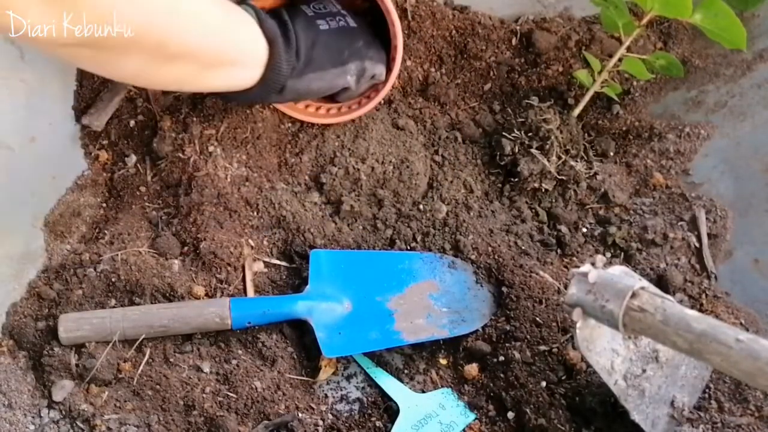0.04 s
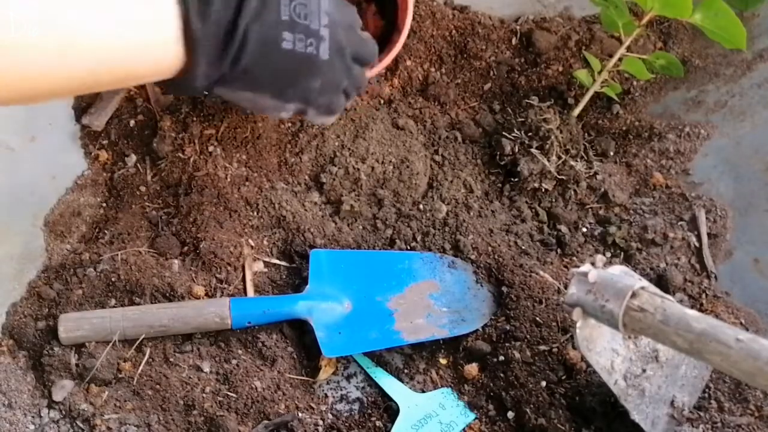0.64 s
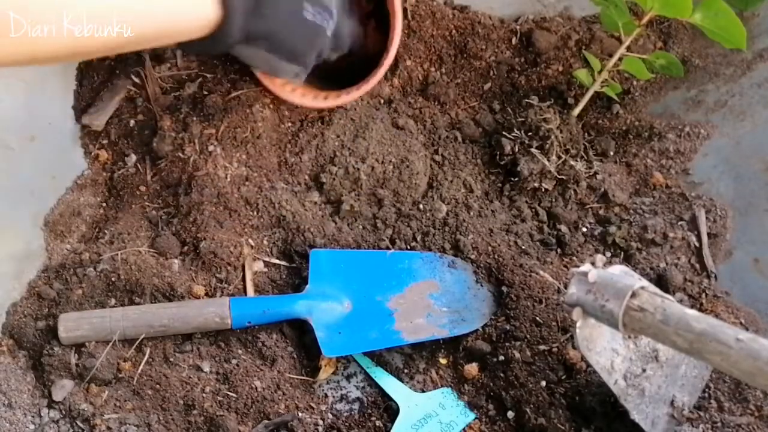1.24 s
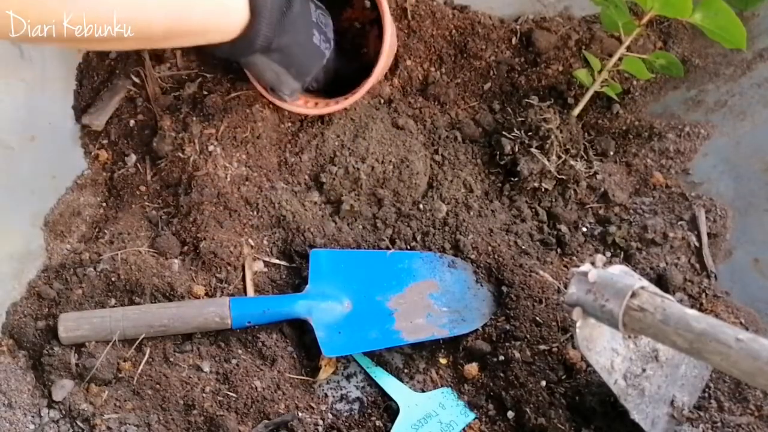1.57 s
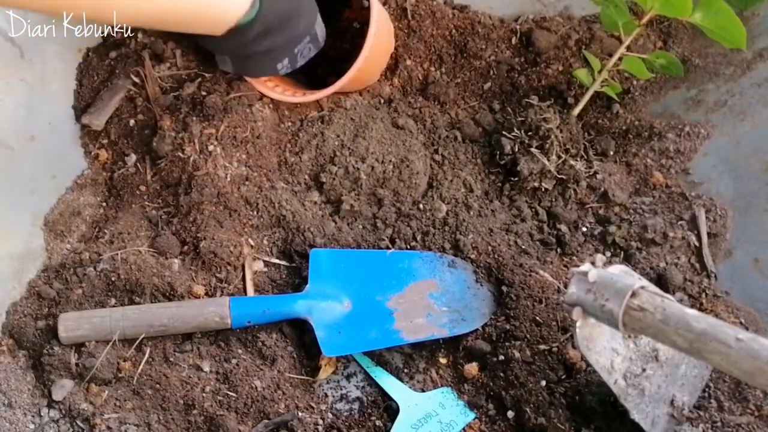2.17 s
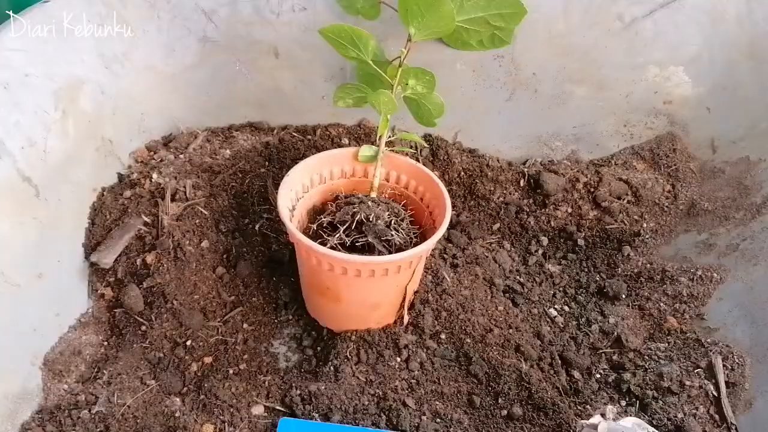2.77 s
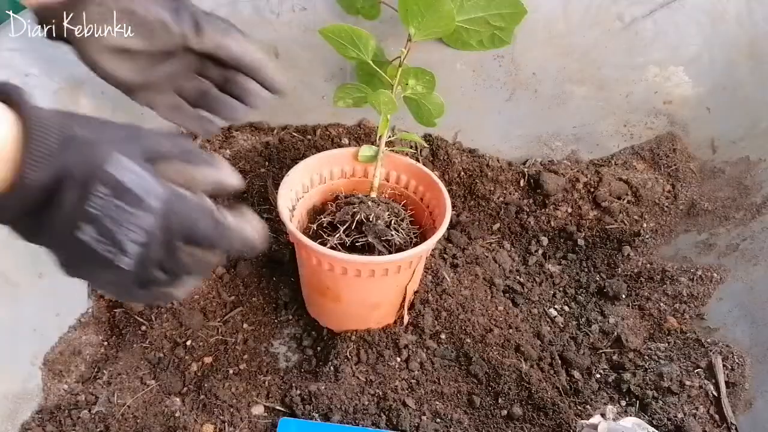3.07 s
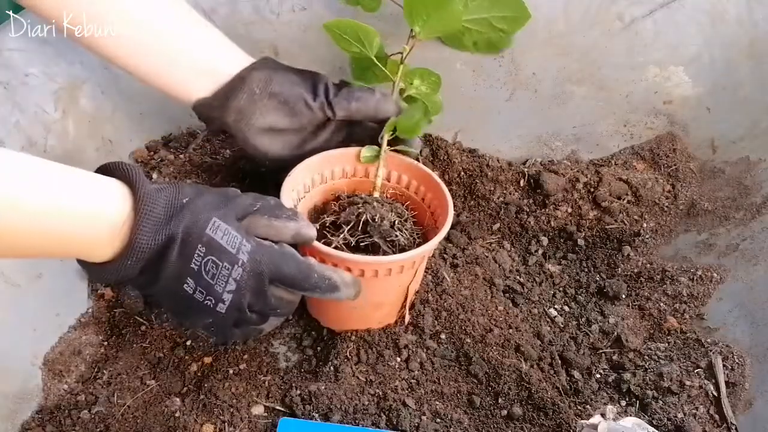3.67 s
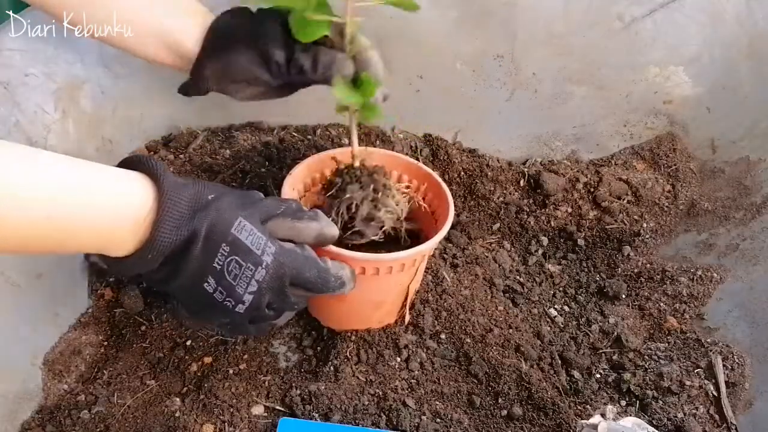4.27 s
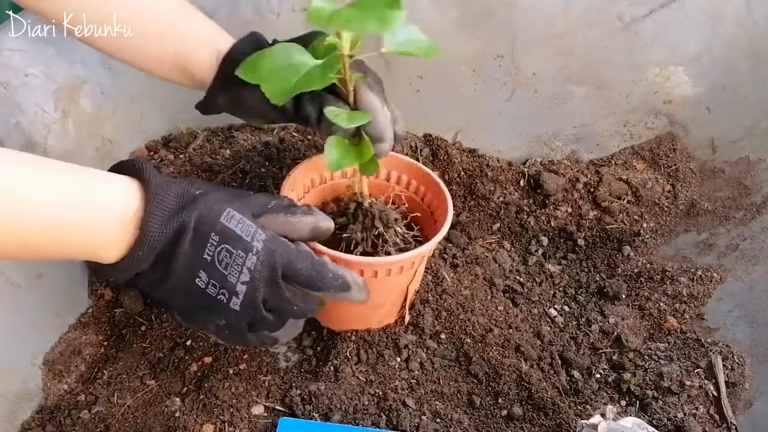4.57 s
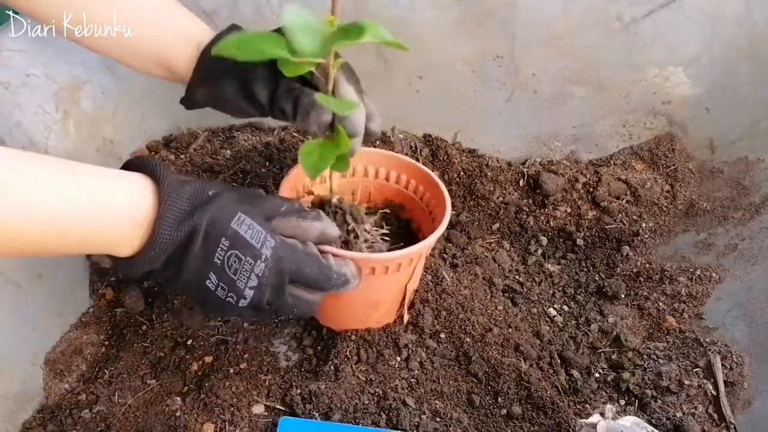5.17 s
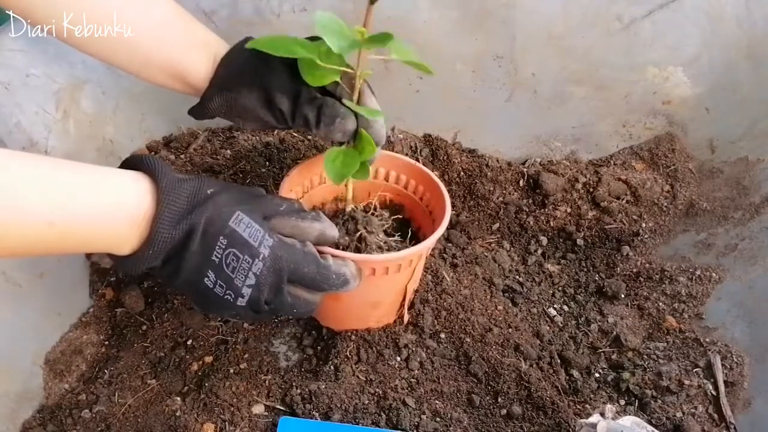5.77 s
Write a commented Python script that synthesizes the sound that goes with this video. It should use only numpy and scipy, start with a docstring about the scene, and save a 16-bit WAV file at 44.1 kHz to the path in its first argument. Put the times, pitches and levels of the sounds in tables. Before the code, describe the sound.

Soil crunches and ticks against a plastic plant pot as rubber gloves rub it, with a faint engine rumbling far off.

```python
"""Potting a seedling.

Gloved hands work crumbly soil in a plastic pot beside a concrete wall, then set a seedling into it.
Slipping crumbs and breaking clods excite the pot's resonances; the rubber gloves squeak by stick-slip.
Behind them a distant engine rumbles, machinery hums, the air hisses, and two insects and a thin whistle
sound faintly. At one instant the background jumps, with a click, to a fuller rumble."""
import sys
import numpy as np
from scipy import signal
from scipy.fft import rfft, irfft
from scipy.io import wavfile

SR = 44100
rng = np.random.default_rng(int(sys.argv[2]) if len(sys.argv) > 2 else 0)


def int16_out(signal):
    """Quantize to a 16-bit WAV file."""
    q = np.round(np.clip(np.atleast_2d(signal).T, -1, 1) * 32767)
    wavfile.write(sys.argv[1], SR, q.astype(np.int16))


N = 256662
TIME = np.arange(N) / SR
FREQS = np.maximum(np.fft.rfftfreq(N, 1 / SR), 1)
JUMP_S = 2.703   # the background passes from its first state to its second
RESTING_DB = -78.5   # grinding between strokes: the hands never lie quite still

# Spectrum of coarse crumbs crunching: f/Hz, relative spectral level/dB
CRUNCH_SPECTRUM = [(300, -11.5), (510, -2), (620, -15.5), (760, -3.5), (930, -2), (1100, 0.5), (1330, -3.5),
                   (1800, -4.5), (2600, -36.5)]
# Spectrum of the hiss of sliding glove and crumbs: f/Hz, relative spectral level/dB
HISS_SPECTRUM = [(2400, -7.5), (3800, -0.5), (5500, 2), (7000, 0), (8400, -3.5), (9700, -0.5), (11500, -6),
                 (13000, -13), (15000, -26)]


def from_db(db):
    """Amplitude ratio of a level: a factor of ten per 20 dB."""
    return 10 ** (np.asarray(db) / 20)


def unit_rms(x):
    """Normalisation to unit mean power."""
    return x / np.sqrt(np.mean(x ** 2) + 1e-20)


def balance(left_db):
    """Interaural level difference: the left gains the level that the right loses."""
    return from_db([[left_db], [-left_db]])


def at_freqs(points):
    """Interpolation of a curve on a logarithmic frequency axis."""
    hz, value = np.transpose(points)
    return np.interp(np.log(FREQS), np.log(hz), value)


def drift(knots_per_s):
    """Random modulation of unit rms: Gaussian values joined by straight lines."""
    knots = rng.standard_normal(1400)
    return unit_rms(np.interp(TIME * knots_per_s, np.arange(len(knots)), knots))


def colour(x, spectrum):
    """Minimum-phase filtering by the folded cepstrum; white noise keeps its power."""
    cepstrum = irfft(np.log(unit_rms(from_db(at_freqs(spectrum)))), N)
    cepstrum[1:N // 2] *= 2
    cepstrum[N // 2 + 1:] = 0
    return irfft(rfft(x) * np.exp(rfft(cepstrum)), N)


def resonate(x, hz, width_hz, block=256):
    """Two-pole resonance whose centre follows a curve; white noise keeps its power."""
    radius = np.exp(-np.pi * width_hz / SR)
    b = np.sqrt((1 - radius ** 2) / 2) * np.array([1, 0, -1])
    out, state = np.zeros_like(x), np.zeros((2, 2))
    for i in range(0, x.shape[1], block):
        a = [1, -2 * radius * np.cos(2 * np.pi * hz[i] / SR), radius ** 2]
        out[:, i:i + block], state = signal.lfilter(b, a, x[:, i:i + block], zi=state)
    return out


def diffuse_noise(gain):
    """A diffuse field of unit rms: the two sides are coherent only at long wavelengths."""
    # Likeness of left and right: f/Hz, correlation coefficient
    correlation = [(30, .9993), (70, .996), (150, .975), (250, .78), (350, .48), (480, -.35), (700, -.45),
                   (1000, -.2), (1500, .08), (12000, 0)]
    # Lean of the field: f/Hz, level/dB added on the left and taken from the right
    left_bias = [(200, 0), (450, 1), (1000, 1), (2500, 0), (6000, -1)]
    mid, side = rfft(rng.standard_normal((2, N)))
    alike = at_freqs(correlation)
    ears = np.sqrt(1 + alike) * mid + np.sqrt(1 - alike) * side * [[1], [-1]]
    lean = from_db(at_freqs(left_bias) * [[1], [-1]])
    return unit_rms(irfft(gain * ears * lean, N))


def air(first_db=-69.5, second_db=-65.5):
    """Outdoor hiss is diffuse broadband noise, a little louder after the jump."""
    # Hiss before and after the jump: f/Hz, relative spectral level/dB
    first_spectrum = [(260, -1), (450, -5), (763, -8.5), (979, -8.5), (1070, -10), (1310, -9.5),
                      (1430, -26), (1570, -6.5), (2190, -8), (3080, -12.5), (3360, -13), (8340, -35),
                      (9800, -26), (10900, -29), (15000, -26)]
    second_spectrum = [(260, -10), (450, 3), (484, -3), (577, -0.5), (786, -1.5), (1330, -6), (1790, -3),
                       (2360, -7.5), (2620, -6), (3410, -15.5), (5450, -17), (6500, -25), (8850, -23.5),
                       (9660, -23.5), (15000, -27)]
    first = from_db(first_db) * diffuse_noise(from_db(at_freqs(first_spectrum)))
    second = from_db(second_db) * diffuse_noise(from_db(at_freqs(second_spectrum)))
    return np.where(TIME < JUMP_S, first, second)


def engine_rumble(split_hz=70):
    """A distant engine as two noise bands, throb and drone, each with its own amplitude modulation."""
    # Rumble before and after the jump: f/Hz, relative spectral level/dB
    first_spectrum = [(12, -24), (20, 1), (43, 15.5), (64, -3.5), (92, -3), (106, -3.5), (124, -7.5),
                      (238, -16.5), (259, -29.5), (282, -19.5), (349, -25), (370, -25), (426, -26.5),
                      (499, -34.5), (600, -35), (780, -48), (1320, -120)]
    second_spectrum = [(12, -63), (20, 4.5), (43, 5.5), (64, -0.5), (92, -3), (109, -9.5), (147, -5),
                       (162, -7.5), (245, -22), (270, -23), (340, -20), (414, -40), (492, -32),
                       (600, -44.5), (780, -57), (1320, -120)]
    # Envelopes of the deep throb and of the drone above it: t/s, level/dB
    throb_levels = [(0.0, -50), (1.33, -59), (1.39, -43.5), (1.49, -55.5), (2.66, -53), (2.97, -45),
                    (3.29, -52.5), (3.6, -41.5), (3.69, -66), (3.76, -41.5), (4.07, -59), (4.15, -47),
                    (5.33, -48.5), (5.38, -43), (5.56, -61), (5.82, -53)]
    drone_levels = [(0.0, -54.5), (0.18, -49.5), (0.47, -53), (1.47, -51), (1.54, -52), (2.28, -47.5),
                    (2.38, -56), (3.14, -42), (3.18, -49), (4.41, -48), (4.49, -45), (4.78, -46),
                    (5.62, -44.5), (5.82, -45.5)]
    throb_db = np.interp(TIME, *np.transpose(throb_levels))
    drone_db = np.interp(TIME, *np.transpose(drone_levels))
    throb_share = 1 / (1 + (FREQS / split_hz) ** 8)
    parts = []
    for spectrum in (first_spectrum, second_spectrum):
        gain = from_db(at_freqs(spectrum))
        throb = from_db(throb_db) * diffuse_noise(gain * np.sqrt(throb_share))
        drone = from_db(drone_db) * diffuse_noise(gain * np.sqrt(1 - throb_share))
        parts.append(throb + drone)
    return np.where(TIME < JUMP_S, *parts)


def machinery_hum(wander_hz=3.564, waver_db=2.5):
    """Distant machinery has a line spectrum, each line wavering in frequency and level."""
    # Spectral lines: f/Hz, level/dB before the jump, level/dB after it
    lines = [(41.5, -80, -53.5), (86.4, -54, -54), (149.5, -66, -60), (233.4, -65, -69),
             (269.8, -74.5, -72.5), (375, -74.5, -76), (429.5, -78, -84)]
    out = 0
    for hz, first_db, second_db in lines:
        turns = np.cumsum(hz + wander_hz * drift(22)) / SR + rng.random()
        level_db = np.where(TIME < JUMP_S, first_db, second_db) + waver_db * drift(13)
        out = out + from_db(level_db) * np.sin(2 * np.pi * turns)
    return out


def whistle(hz=12898, wander_hz=11, left_db=-102, right_db=-89.5):
    """A thin pure tone under random frequency modulation, mostly on the right."""
    turns = np.cumsum(hz + wander_hz * drift(90)) / SR
    return from_db([[left_db], [right_db]]) * np.sin(2 * np.pi * turns)


def insect(phrases, hz, glide_hz, width_hz, pulses_per_s, pulse_depth, left_db):
    """Source and filter: a noisy rasp rings one narrow resonance, amplitude-modulated into pulses."""
    edge_s, rate_spread, waver_db = 0.087, 0.15, 2.0
    envelope, centre_hz = np.zeros(N), np.full(N, float(hz))
    for start_s, length_s, level_db in phrases:
        gate = np.clip(np.minimum(TIME - start_s, start_s + length_s - TIME) / edge_s, 0, 1)
        envelope += from_db(level_db) * gate
        centre_hz += (gate > 0) * glide_hz * ((TIME - start_s) / length_s) ** 2
    turns = np.cumsum(pulses_per_s * (1 + rate_spread * drift(25))) / SR
    pulses = unit_rms(1 + pulse_depth * np.sin(2 * np.pi * turns))
    rasp = rng.standard_normal((2, N))
    for _ in range(2):   # two passes steepen the resonance
        rasp = resonate(rasp, centre_hz, width_hz, block=1024)
    return unit_rms(rasp) * envelope * pulses * balance(left_db) * from_db(waver_db * drift(10))


def insects():
    """Two far insects on the left: fast modulation makes a rising buzz, slower modulation a trill."""
    # Phrases of each insect: start t/s, duration/s, level/dB
    buzzes = [(0, 0.79, -90), (.95, .8, -87), (2.1, 0.72, -87), (3.1, .8, -87.5), (4.13, 0.99, -88.5),
              (5.08, 0.89, -87.5)]
    trills = [(.7, .5, -89), (3.2, 0.6, -85), (4.13, 0.85, -84), (5.22, .62, -84.5)]
    buzz = insect(buzzes, 9520, glide_hz=228, width_hz=480, pulses_per_s=56, pulse_depth=.18, left_db=8)
    trill = insect(trills, 7800, glide_hz=-40, width_hz=560, pulses_per_s=28, pulse_depth=.31,
                   left_db=4.5)
    return buzz + trill


def yard_reverb(x, t60_s=0.085, wet_db=-8.5, gap_s=0.003):
    """Reflections from ground and wall form a short diffuse tail that decays exponentially."""
    age = TIME[:SR // 3]
    tail = rng.standard_normal((2, len(age))) * from_db(-60 * age / t60_s) * (age > gap_s)
    tail /= np.sqrt(np.sum(tail ** 2, axis=1, keepdims=True))
    return x + from_db(wet_db) * signal.fftconvolve(x, tail, axes=1)[:, :N]


def hand_bumps(pitch_spread=0.0934):
    """The hands bump dully as they move in: low tone bursts under Gaussian envelopes."""
    # Bumps: centre t/s, 1/e half-width/s, f/Hz, rms level/dB at the centre
    bumps = [(1.245, 0.054, 87, -45.5), (1.37, 0.054, 87.3, -48.5), (2.852, 0.044, 84.7, -41),
             (2.961, 0.02, 84.7, -46), (3.124, 0.028, 115.8, -34.5), (3.44, 0.036, 139.8, -46.5),
             (4.533, 0.1, 130.1, -46.5)]
    unsteady_time = np.cumsum(1 + pitch_spread * drift(90)) / SR
    out = np.zeros(N)
    for centre_s, half_width_s, hz, level_db in bumps:
        envelope = from_db(level_db) * np.sqrt(2) * np.exp(-((TIME - centre_s) / half_width_s) ** 2)
        out += envelope * np.sin(2 * np.pi * (hz * unsteady_time + rng.random()))
    return out


def grains(per_s, spread_db, clump_db, scatter_db=4.5, lag_spread_s=0.0001, right_lead_s=0.00012):
    """Shot noise of slips in clumps; each click has its own interaural time and level difference."""
    sizes = from_db(spread_db * np.minimum(rng.exponential(1, N), 4) + clump_db * drift(170))
    clicks = sizes * rng.choice([-1, 1], N) * (rng.random(N) < per_s / SR)
    pan = from_db(scatter_db * rng.standard_normal(N) / 2)
    lag = np.round(SR * (lag_spread_s * rng.standard_normal(N) - right_lead_s)).astype(int)
    right = np.bincount((np.arange(N) + lag) % N, clicks / pan, N)
    return unit_rms(np.array([clicks * pan, right]))


def glove_squeaks(pitch_spread=0.012, rough_db=-0.5, left_db=3.0):
    """Stick-slip friction of rubber: tiny slips ring one steep resonance that moves with the grip."""
    # Gloves chafing pot and stem: t/s, rise/s, decay/s, f/Hz, glide/(Hz/s), bandwidth/Hz, level/dB
    squeaks = [(0.012, 0.022, 0.023, 4330, 0, 300, -64), (.01, 0.02, .11, 1830, 0, 450, -64),
               (.265, 0.021, 0.1, 2100, 0, 700, -72), (0.748, 0.014, 0.05, 1950, -700, 616, -56.5),
               (1.011, 0.013, 0.025, 2780, -3, 420, -53.5), (1.014, 0.02, 0.017, 4020, 0, 530, -55),
               (1.02, 0.015, 0.02, 1800, 0, 400, -57.5), (1.342, 0.017, 0.029, 5430, 0, 450, -65),
               (1.35, 0.039, .015, 2020, 0, 400, -60), (1.438, 0.011, 0.032, 2160, 0, 1100, -52.5),
               (1.445, .03, 0.063, 5400, 0, 700, -70), (1.881, 0.014, .03, 1850, -1000, 500, -47.5),
               (1.879, .012, 0.033, 4850, 0, 1800, -54), (1.888, 0.03, 0.071, 1325, -200, 170, -51),
               (2.273, 0.033, 0.0057, 3970, 0, 1300, -56.5), (2.375, 0.016, 0.02, 2190, 0, 380, -57),
               (2.785, 0.01, .02, 2020, 0, 300, -51.5), (2.803, 0.022, 0.047, 1940, -200, 400, -50),
               (2.87, .015, .02, 2170, 0, 400, -58), (2.918, 0.016, 0.025, 2130, 0, 450, -55),
               (3.035, 0.064, 0.021, 2700, 2000, 870, -53), (4.138, 0.039, 0.016, 1840, 0, 650, -52.5),
               (4.158, 0.015, 0.012, 3860, 0, 420, -57), (4.17, 0.018, .008, 2600, 0, 600, -56),
               (4.545, 0.032, 0.027, 3850, 0, 1500, -68), (4.93, 0.022, 0.033, 3800, 0, 2000, -70.5),
               (4.76, 0.32, 0.25, 1730, -200, 220, -69.5), (5.045, .015, .012, 1750, 0, 150, -62),
               (5.47, .014, 0.011, 1680, 0, 300, -62), (5.487, 0.01, .0094, 2630, 0, 300, -61.5)]
    slips = grains(per_s=4000, spread_db=0.0, clump_db=1.0) * from_db(rough_db * drift(250))
    grip = 1 + pitch_spread * drift(70)
    out = np.zeros((2, N))
    for start_s, rise_s, decay_s, hz, glide_hz_per_s, width_hz, level_db in squeaks:
        span = slice(int(start_s * SR), int(start_s * SR) + SR // 2)
        age = TIME[span] - TIME[span][0]
        swell = np.minimum(age / rise_s, np.exp(-(age - rise_s) / decay_s))
        centre_hz = (hz + glide_hz_per_s * np.minimum(age, rise_s + 2 * decay_s)) * grip[span]
        ringing = resonate(slips[:, span], centre_hz, width_hz)
        chafe = swell * resonate(ringing, centre_hz, width_hz)
        out[:, span] += from_db(level_db) * unit_rms(chafe) * np.sqrt(np.mean(swell ** 2))
    return out * balance(left_db)


def ticks(contact_s=0.00008, right_lead_s=0.00008, left_db=-1.0):
    """Impulse response: each tick rings as a damped sinusoid, arriving first on the right."""
    # The row at 2.7031 s is a dull click as the background jumps; the others are hard crumbs and twigs
    # flicking the pot: t/s, level/dB, f/Hz, bandwidth/Hz
    impulses = [(0.0208, -45, 3000, 1500), (0.0442, -52, 1500, 600), (0.2754, -62, 2200, 1200),
                (0.335, -52, 2200, 1000), (0.4128, -55, 2000, 1000), (1.0185, -46, 3900, 1600),
                (1.448, -46, 2400, 900), (1.4682, -35, 1930, 400), (1.4756, -37, 5300, 2400),
                (1.4832, -37, 1210, 900), (1.5955, -46, 2300, 1000), (1.8912, -33.5, 1820, 800),
                (1.8989, -49, 2700, 1800), (1.93, -40, 1390, 600), (1.952, -52, 1510, 700),
                (1.9665, -40, 2900, 1800), (2.0195, -36.5, 2600, 1400), (2.024, -34, 4300, 3000),
                (2.037, -47, 3400, 2200), (2.136, -52, 2200, 1200), (2.1975, -38, 2600, 1500),
                (2.222, -36, 2500, 1300), (2.2322, -35, 2300, 1100), (2.2416, -39, 1900, 900),
                (2.2339, -46, 770, 150), (2.415, -40, 2400, 600), (2.7031, -42, 495, 900),
                (3.1135, -42, 2000, 900), (3.314, -54, 2400, 1200), (3.344, -53, 4200, 3000),
                (3.4628, -54, 2400, 1200), (3.5036, -49, 2300, 1200), (3.5345, -44, 2600, 1600),
                (3.5796, -45, 2400, 1400), (3.854, -55, 2400, 1400)]
    out = np.zeros((2, N))
    for start_s, level_db, hz, width_hz in impulses:
        span = slice(int(start_s * SR), int(start_s * SR) + SR // 50)
        age = np.maximum(TIME[span] - start_s - np.array([[right_lead_s], [0]]), 0)
        envelope = (1 - np.exp(-age / contact_s)) * np.exp(-np.pi * width_hz * age)
        out[:, span] += from_db(level_db) * envelope / envelope.max() * np.sin(2 * np.pi * hz * age)
    return out * balance(left_db)


def cracks(rise_s=0.001, decay_s=0.0077, shower_db=-10.5, snap_db=-4.5, cutoff_hz=11000):
    """Impulsive excitation: one snap and a quick shower of clicks ring a resonance."""
    # The row at 2.7046 s is a sharp tick as the background jumps; the others are clods and twigs giving
    # way against the pot: t/s, level/dB, resonance f/Hz, relative crunch/dB, relative hiss/dB
    snaps = [(1.016, -41.5, 4000, -20, -11), (1.4483, -33, 2150, -24, -24), (1.467, -43, 1890, -15, -25),
             (1.641, -43.5, 3060, -24, -5), (1.849, -26.5, 2220, -21, -11.5), (1.88, -27, 1750, -5, -21),
             (1.891, -41, 1900, -12, -14), (1.923, -36, 1340, -6, -21), (2.0193, -33.5, 2900, -29, -20),
             (2.219, -46, 2400, -9, -6), (2.231, -36, 2400, -2.5, -20), (2.398, -39.5, 2170, -2.5, -22),
             (2.413, -35.5, 2350, -10, -26), (2.7046, -33.5, 2640, -15, -9.5), (3.342, -46, 2050, -19, -14),
             (3.535, -53, 2000, -19, -9.5), (4.765, -48, 2000, -7, -16), (5.098, -41, 1700, -16, -10),
             (5.116, -38, 2110, -19, -17.5), (5.235, -44.5, 2100, 1.5, -21)]
    grit = from_db(shower_db) * grains(per_s=3000, spread_db=-1.0, clump_db=2.5, lag_spread_s=0.0003)
    knock, crunch, hiss = np.zeros((3, 2, N))
    for start_s, level_db, hz, crunch_db, hiss_db in snaps:
        span = slice(int(start_s * SR), int(start_s * SR) + SR // 5)
        age = TIME[span] - TIME[span][0]
        envelope = (1 - np.exp(-age / rise_s)) * np.exp(-age / decay_s)
        shower = grit[:, span] * from_db(level_db) * envelope
        shower[:, 0] += from_db(level_db + snap_db)
        knock[:, span] += resonate(shower, np.full(len(age), hz), width_hz=600)
        crunch[:, span] += shower * from_db(crunch_db)
        hiss[:, span] += shower * from_db(hiss_db)
    low_pass = signal.butter(2, cutoff_hz, fs=SR, output="sos")   # dulls the cracks above the cutoff
    return signal.sosfilt(low_pass, knock + colour(crunch, CRUNCH_SPECTRUM) + colour(hiss, HISS_SPECTRUM))


def stroke_envelopes(attack_s=0.036, release_s=0.024, resting_crunch_db=1.5, resting_hiss_db=-0.5):
    """Amplitudes of grinding, crunch and hiss; overlapping strokes are incoherent and add in power."""
    # Glove strokes: full pressure at t/s, hold/s, level/dB, relative crunch/dB, relative hiss/dB
    strokes = [(0.022, 0.024, -66, -11, -1.5), (0.08, 0.063, -70.5, -4, -5.5),
               (0.3, 0.11, -73.5, -16, -1.5), (0.89, 0.16, -69, -29, -4.5), (1.027, 0.019, -62, -21, 1),
               (1.205, 0.066, -67.5, -8, -1.5), (1.38, 0.022, -57.5, -4.5, -1.5),
               (1.455, 0.059, -61, -4, -3), (1.53, 0.07, -65.5, -4, -1), (1.645, 0.015, -60.5, -6, -5.5),
               (1.755, 0.12, -63, -12, -3.5), (1.9, 0.008, -53, 2.5, -5), (1.93, 0.12, -56.5, -1.5, -8),
               (2.03, 0.12, -54.5, -8, -3.5), (2.21, 0.097, -60.5, -0.5, 0), (2.234, 0.009, -50, -8, -6),
               (2.41, 0.043, -64.5, -7, -1), (2.5, 0.13, -68.5, -7, -7.5), (2.72, 0.017, -63.5, -21, -2.5),
               (2.817, 0.048, -60.5, -5, 7.5), (2.885, 0.02, -63.5, -5, 4), (2.94, 0.0097, -58, -4, 0),
               (3.055, 0.084, -57, -11, -9), (3.074, 0.055, -66, -24, 11.5), (3.19, 0.039, -72, 1, -1),
               (3.35, .25, -74, 2, -6), (3.97, 0.012, -72, -15, 0), (4.168, 0.018, -65.5, 2, -1.5),
               (4.33, 0.02, -76, -10, -2), (4.55, 0.032, -66.5, -5, -3), (4.73, 0.044, -71.5, 1, -2.5),
               (4.89, 0.12, -73, 2, -4.5), (5.122, 0.042, -68, -9, -8), (5.349, 0.22, -75.5, 1, -3.5)]
    resting = from_db(RESTING_DB + np.array([[0], [resting_crunch_db], [resting_hiss_db]]))
    power = resting ** 2 * np.ones(N)
    for full_s, hold_s, level_db, crunch_db, hiss_db in strokes:
        span = slice(max(int(full_s * SR) - SR // 5, 0), int(full_s * SR) + SR // 2)
        age = TIME[span] - full_s
        # a stroke builds up, holds, and dies away as the crumbs settle
        envelope = np.exp(np.minimum(age, 0) / attack_s - np.maximum(age - hold_s, 0) / release_s)
        gains = from_db(level_db + np.array([[0], [crunch_db], [hiss_db]]))
        power[:, span] += (gains * envelope) ** 2
    return np.sqrt(power)


def soil_rubbing(resting_wall_hz=1880, rise_hz_per_db=17):
    """Granular friction drives the pot's resonances; pressure adds crunch, the sliding glove hiss."""
    # Hollow modes of the pot: f/Hz, bandwidth/Hz, level/dB relative to the grinding
    pot_modes = [(756, 20, -24.5), (927, 16, -23.5), (980, 9.8, -28), (1264, 33, -13.5), (1320, 50, -19),
                 (1579, 23, -12.5), (1826, 40, -15.5), (1932, 70, -11), (2206, 30, -21.5),
                 (2470, 50, -13.5), (2690, 29, -17.5), (2975, 60, -19)]
    # Rustle of fine grains: f/Hz, relative spectral level/dB
    rustle_spectrum = [(800, -21), (1300, -7), (1800, 3), (2500, 1), (2950, -1), (3350, -3.5), (3900, -4.5),
                       (4600, -13.5), (7000, -32.5)]
    grinding, crunching, hissing = stroke_envelopes()
    # firmer rubbing rings the pot wall higher
    wall_hz = resting_wall_hz + rise_hz_per_db * (20 * np.log10(grinding) - RESTING_DB)
    grit = grains(per_s=4500, spread_db=1.0, clump_db=-1.0) * grinding
    wall = from_db(-3.5) * resonate(grit, wall_hz, width_hz=730)
    # coarse crumbs lie deep in the pot, ring its modes and are heard mostly by reflection
    coarse = grains(per_s=2500, spread_db=3.0, clump_db=1.5, lag_spread_s=0.00059)
    crunch = colour(coarse * crunching, CRUNCH_SPECTRUM)
    hollow = sum(from_db(level_db) * resonate(coarse * grinding, [hz], width_hz, block=N)
                 for hz, width_hz, level_db in pot_modes)
    fine = grains(per_s=4000, spread_db=2.0, clump_db=2.0) * grinding
    rustle = from_db(1.0) * colour(fine, rustle_spectrum)
    glove = grains(per_s=10000, spread_db=1.6, clump_db=1.0) * hissing
    return wall + crunch + hollow + rustle + colour(glove, HISS_SPECTRUM)


def scene():
    """Superposition of the pot, a little to the left, its reflections and the background."""
    direct = soil_rubbing() + cracks() + ticks() + glove_squeaks()
    pot = yard_reverb(direct) * balance(left_db=0.5)
    return pot + hand_bumps() + engine_rumble() + machinery_hum() + air() + insects() + whistle()


def record(dry, fade_s=0.008, cutoff_hz=15250):
    """Band limiting: a steep low-pass cuts the top, and the sound ends in a brief linear fade."""
    fade = np.minimum((TIME[-1] - TIME) / fade_s, 1)
    low_pass = signal.ellip(12, 0.1, 80, cutoff_hz, fs=SR, output="sos")
    return signal.sosfilt(low_pass, dry * fade)


dry = scene()
out = record(dry)
int16_out(out)
```